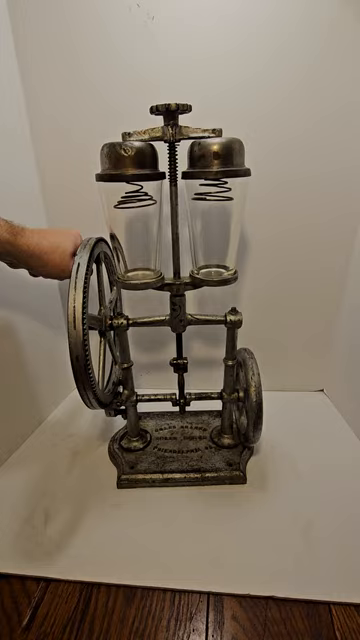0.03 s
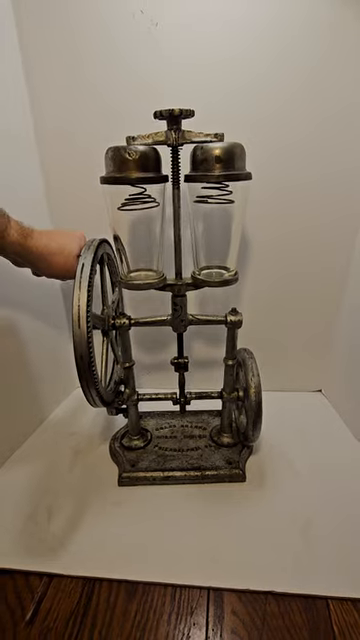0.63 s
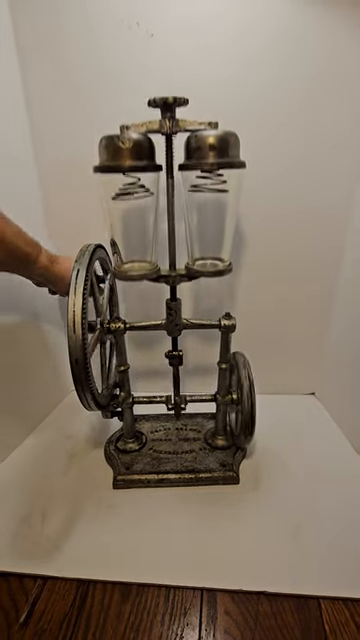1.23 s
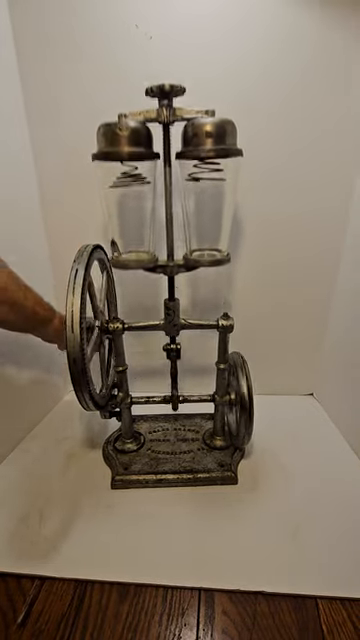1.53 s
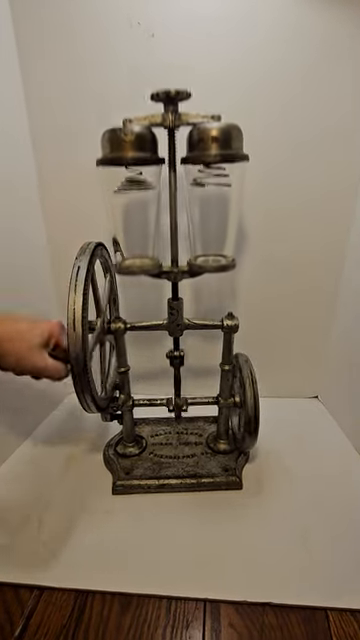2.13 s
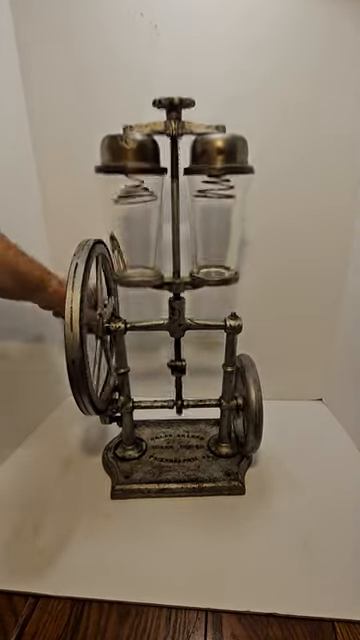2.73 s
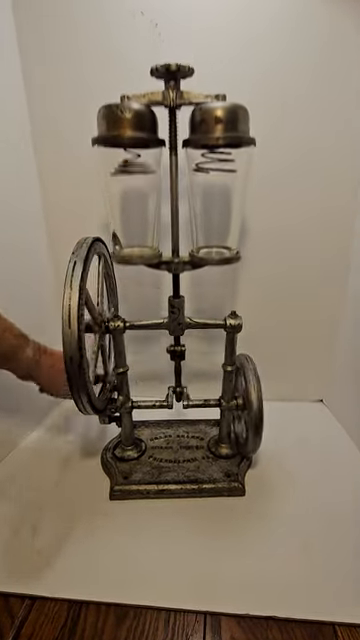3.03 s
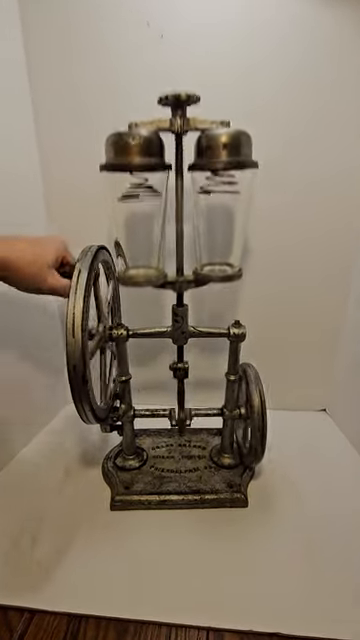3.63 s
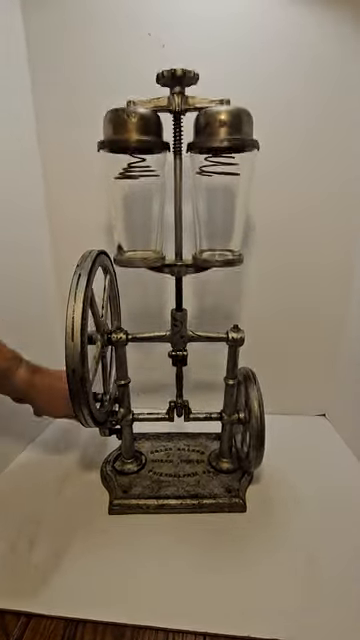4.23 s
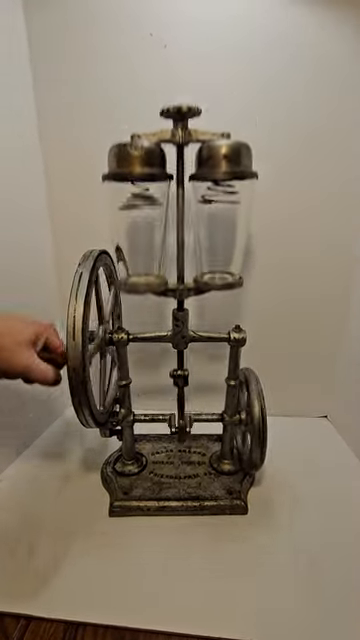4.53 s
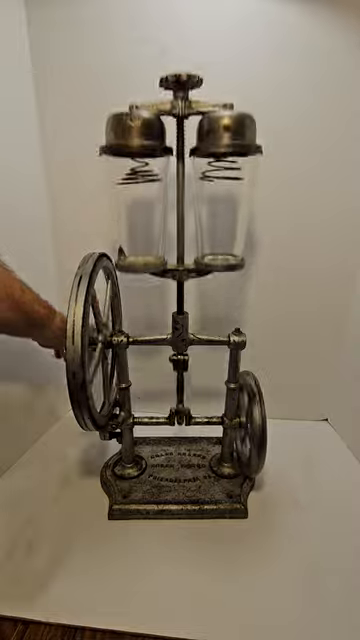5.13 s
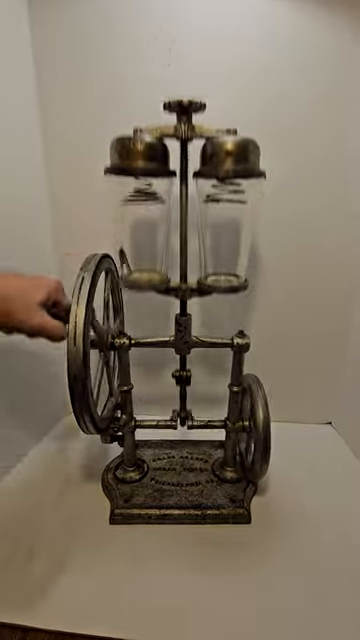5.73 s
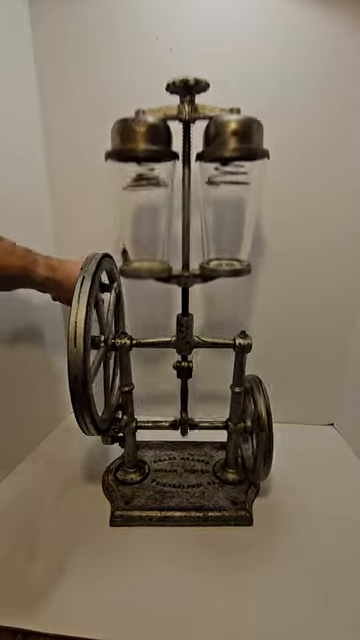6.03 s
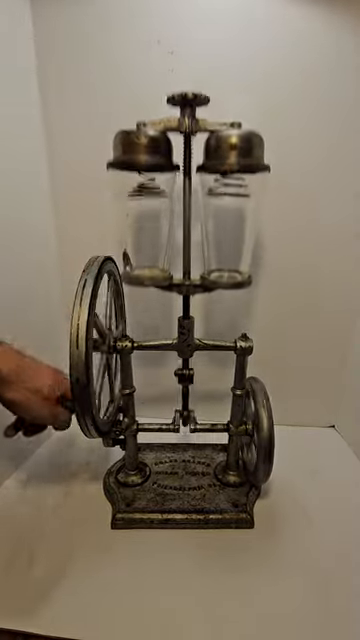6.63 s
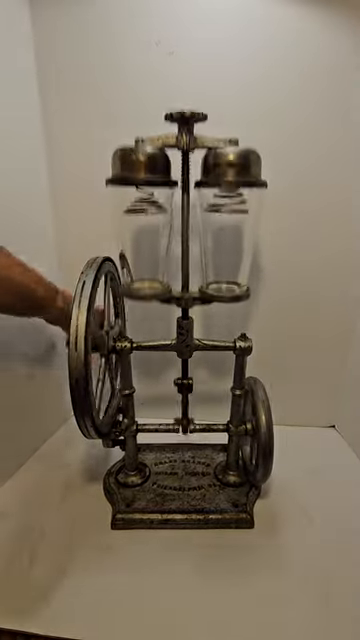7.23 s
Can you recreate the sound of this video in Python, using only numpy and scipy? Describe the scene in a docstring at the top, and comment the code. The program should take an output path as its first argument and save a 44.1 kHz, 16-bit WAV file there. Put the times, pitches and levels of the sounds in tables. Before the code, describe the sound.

An old iron shaking machine is cranked faster and faster, grinding, thudding and clattering rhythmically in a small, quiet room.

```python
"""First comes a soft bump in a small, quiet room; then a hand-cranked, cast-iron milkshake shaker
growls up to speed on a board. Its gear teeth drum the base, grind in the frame and rattle the joints.
The carriage (the part that carries two empty glasses up and down) knocks at the ends of its strokes.
Loose joints clack, the frame clanks and the base thuds. On top of that, metal caps ring,
wire coils jingle and the glasses tick in their holders."""
import sys
import numpy as np
from scipy import signal
from scipy.fft import rfft, irfft
from scipy.io import wavfile
from scipy.ndimage import uniform_filter1d

SR = 44100
rng = np.random.default_rng(int(sys.argv[2]) if len(sys.argv) > 2 else 0)


def digitize_waveform(pressure):
    """Quantize a signal to 16-bit integers and store it at the path in sys.argv[1].

    Rows of a 2-D input are taken as channels; values are limited to [-1, 1].
    """
    field = np.atleast_2d(pressure).T
    bounded = np.clip(field, -1, 1)
    quanta = np.round(bounded * 32767).astype(np.int16)
    wavfile.write(sys.argv[1], SR, quanta)


N = 329427
T = np.arange(N) / SR

# how fast the crank turns the wheel: (time [s], speed [turns/s])
CRANK_SPEED = [(.55, 0), (.58, .13), (.7, .11), (.76, .06), (.84, .16), (1, .24), (1.14, .26), (1.3, .626),
               (2.2, .786), (3.4, .796), (4.4, .912), (5.2, .846), (6, .93), (7.46, .945)]
# the uneven load in every turn: (position [turns], boost on base [dB], boost on frame and joints [dB])
WHEEL_LOAD = [(0, 4, 1.5), (0.103, 2, 0.5), (0.2, 2.3, 1), (0.298, -0.5, 1), (0.398, 2.6, 0),
              (.5, -2, -0.5), (.6, 1.5, 1.5), (.7, 0.3, 2.5), (.8, 5, 3.5), (.9, -0.5, -1)]
# the shaft judders as it speeds up: (time [s], rate [judders/s], level [dB])
JUDDERS = [(1.15, 163, -62), (1.2, 164, -45), (1.3, 139, -34), (1.43, 138, -36.5), (1.53, 107, -50)]

# Event levels are relative: each source adds its own gain and tone. # the base bumps on the board; the faint
# first bump, at 0.39 s, comes as a hand takes hold of the crank: (time [s], level [dB])
THUDS = [(0.39, -55.5), (0.589, -45), (0.956, -46), (1.011, -43.5), (1.215, -37), (1.293, -35),
         (1.57, -31.5), (1.916, -34), (2.206, -25), (2.439, -27.5), (2.678, -26.5), (2.966, -23),
         (3.154, -24), (3.207, -27.5), (3.391, -30), (3.542, -27), (4.168, -23.5), (4.384, -27),
         (4.585, -25.5), (4.668, -27.5), (4.846, -23), (5.224, -23.5), (5.672, -25.5), (6.105, -29),
         (6.387, -26), (6.99, -25), (7.081, -24.5), (7.184, -26), (7.446, -22)]
# the driving rod takes up its slack: (time [s], level [dB])
CLANKS = [(1.294, -42.5), (1.584, -37.5), (1.601, -37), (1.917, -39.5), (2.076, -43.5), (2.181, -42),
          (2.322, -44), (2.439, -39), (2.903, -40.5), (3.426, -37.5), (3.485, -43), (3.642, -37),
          (3.73, -49), (3.798, -40.5), (4.099, -34), (4.119, -41), (4.164, -47), (4.583, -47), (4.824, -38),
          (5.039, -37), (5.223, -39), (5.276, -48), (5.479, -40.5), (5.922, -35), (6.323, -41),
          (6.385, -44), (6.582, -46), (6.835, -43), (7.009, -38), (7.404, -37.5), (7.449, -34)]
# the heavy wheel drops over in its bearing: (time [s], level [dB])
CLUNKS = [(2.393, -34.5), (2.785, -43), (3.873, -36.5), (4.783, -35), (5.667, -36), (5.884, -36),
          (6.324, -33.5), (6.769, -31)]
# the carriage lands: (time [s], level [dB])
KNOCKS = [(.586, -55.5), (1.216, -40.5), (1.656, -36), (2.038, -39), (2.257, -32), (2.459, -31.5),
          (2.774, -34), (2.965, -30.5), (3.149, -37), (3.492, -30.5), (3.706, -31.5), (3.749, -35),
          (3.88, -33), (3.932, -35), (4.167, -30.5), (4.665, -34), (4.78, -35), (4.845, -28),
          (5.279, -31.5), (5.665, -34), (5.776, -41), (5.95, -28.5), (6.388, -29.5), (6.84, -33.5),
          (6.862, -36), (7.035, -30.5), (7.451, -34)]
# the hardest clacks of the joints: (time [s], level [dB])
CLACKS = [(0.802, -39.5), (1.262, -35.5), (1.2914, -27.5), (1.5837, -29), (1.613, -21.5), (1.6547, -19),
          (1.741, -28.5), (1.9154, -20), (1.958, -31), (1.992, -27), (2.035, -28.5), (2.144, -29),
          (2.263, -27), (2.322, -25.5), (2.4931, -25), (2.5172, -25), (2.7971, -27.5), (2.9036, -28),
          (2.9627, -20.5), (3.1459, -27), (3.262, -24.5), (3.4171, -21), (3.466, -27), (3.732, -24.5),
          (3.908, -28.5), (4.162, -20), (4.234, -25.5), (4.265, -33), (4.3707, -21), (4.433, -28.5),
          (4.634, -29.5), (4.5853, -29.5), (4.783, -29.5), (4.821, -21.5), (4.868, -23), (4.891, -18.5),
          (4.9794, -22.5), (5.146, -25), (5.2, -24), (5.226, -28), (5.2773, -18.5), (5.48, -25.5),
          (5.596, -35), (5.781, -22), (5.8823, -32), (5.923, -22), (5.968, -21), (6.237, -26),
          (6.3226, -27), (6.348, -21.5), (6.39, -21.5), (6.452, -28.5), (6.4832, -26.5), (6.5821, -18),
          (6.6415, -24), (6.679, -25), (6.866, -29), (7.0116, -19), (7.0538, -21.5), (7.092, -29),
          (7.311, -26.5), (7.347, -26.5), (7.374, -31), (7.3987, -19)]
# the first cap hits its glass: (time [s], level [dB])
CAP_A_HITS = [(1.5838, -33.5), (1.9155, -39), (2.144, -43), (2.665, -42.5), (2.9053, -39), (3.1467, -35),
              (3.4271, -38.5), (3.652, -45.5), (3.7334, -40.5), (3.892, -43), (4.0841, -41),
              (4.1091, -31.5), (4.1244, -30.5), (4.312, -44.5), (4.5835, -40.5), (4.82, -43), (4.9816, -38),
              (5.0225, -41), (5.2001, -35), (5.2265, -32.5), (5.482, -45), (5.64, -42), (6.0965, -38.5),
              (6.3061, -42), (6.328, -33.5), (6.3444, -32), (6.5819, -40.5), (6.695, -51), (6.82, -42),
              (7.056, -43.5), (7.15, -46), (7.3756, -36), (7.3994, -34), (7.4505, -34)]
# the second cap hits its glass: (time [s], level [dB])
CAP_B_HITS = [(2.4947, -50), (3.7324, -47.5), (4.1594, -48), (4.8953, -38.5), (5.782, -46), (5.9688, -35.5),
              (7.0559, -36.5)]
# a glass ticks in its holder: (time [s], level [dB], sizzle level [dB])
TICKS = [(2.225, -39.5, -65), (2.322, -41.5, -49), (2.967, -41, -48), (3.415, -41, -64),
         (4.171, -32.5, -34), (4.78, -36.5, -41), (5.072, -36, -58), (5.213, -40, -60),
         (5.282, -33.5, -37.5), (5.5157, -41, -52), (5.88, -36.5, -50), (5.944, -25, -43),
         (6.323, -37.5, -48), (6.384, -32, -55), (6.559, -34.5, -49), (6.8344, -31, -41)]
# dry metal slides with a faint hiss: (start [s], end [s], level [dB])
SCRAPES = [(2.525, 2.98, -59), (4.738, 5.267, -54.5)]
# a wire coil brushes its glass: (time [s], level [dB])
BRUSHES = [(2.875, -55), (4.555, -52), (4.92, -46), (5.228, -52), (5.665, -55), (6.048, -57), (6.762, -64),
           (7.02, -54), (7.09, -65)]

# A mode is a note that a struck part rings at; t60 is the time it takes to fade by 60 dB.
# modes of the base, frame, wheel, coils and caps: (pitch [Hz], level [dB], t60 [s])
BASE_MODES = [(227.5, 2.5, 0.044), (266, -5.5, 0.17), (392, -19.5, 0.19)]
FRAME_MODES = [(895, -5, .08), (1120, -4, .06), (1211, 0, .11), (1305, -2, .07)]
WHEEL_MODES = [(776, -5.5, .07), (861, 2, 0.06), (901, 4.5, 0.072)]
COIL_MODES = [(5900, -14, .05), (6460, 5.5, 0.14), (7400, -4.5, 0.12), (8470, -6, 0.042), (11500, -9, .03),
              (14600, -12, .02)]
CAP_A_MODES = [(4380, -13, .05), (4535, -9, .09), (4740, -7, .04), (4815, -4, .07), (4829, -5, .17),
               (5173, -18, .4), (6638, -21, .12)]
CAP_B_MODES = [(5176, -11, .3), (6640, -8, .09), (7203, -2, .14), (7450, -9, .09), (8226, -11, .12)]
# pitches that the base and frame strengthen: (centre [Hz], width [Hz], boost [dB])
BODY_PEAKS = [(54, 10, 6.5), (93.4, 15.3, 6.5), (158.3, 11, 6), (225.7, 25, 6.5), (270.6, 40, 9),
              (384, 58, 6), (447, 84, 8.5), (515.4, 60, 9), (632, 45, 9), (732, 80, 11.5), (1204, 72, 4),
              (1347, 165, 7), (1625, 19, 7), (2194, 77, 10.5), (2547, 130, 5), (2654, 58, 3),
              (3220, 334, 7), (4380, 200, 3.5)]

# the tone of each sound, from bass to treble: (frequency [Hz], level [dB])
AIR_TONE = [(15, -70), (25, 13), (108, -1.5), (185, 2.5), (1480, -14.5), (3430, -9.5), (3920, -5),
            (7000, -24.5), (8830, -41), (12000, -27.5)]
BASE_TONE = [(15, -48), (28, -1), (45, -3), (62, -10), (90, -5), (125, -5), (180, -7.5), (250, -4.5),
             (340, -17), (500, -34.5), (1000, -56.5), (3000, -82.5)]
FRAME_TONE = [(100, -37.5), (340, -5.5), (480, -4.5), (850, -2.5), (1000, -3.5), (1250, -6.5), (1800, -4.5),
              (3000, -28.5), (8000, -55)]
JOINT_TONE = [(200, -8.5), (900, -8.5), (1800, -9), (2400, -7), (3400, -4.5), (4500, -2), (5500, -9.5),
              (6800, -13.5), (8300, -26), (10000, -45), (15000, -38)]
RATTLE_TONE = [(200, -7), (700, -6), (1800, -4), (2500, -7), (3400, -6.5), (4500, 5.5), (5500, -2.5),
               (6800, -23.5), (8300, -15), (10000, -39.5)]
KNOCK_TONE = [(100, -38), (250, -22), (340, -6), (650, -5.5), (850, -6), (1100, -5.5), (1800, -18),
              (3000, -16), (8000, -39.5)]
CRACK_TONE = [(300, -11), (850, -13.5), (1350, -3), (1700, -10.5), (2200, -7), (3000, -11.5), (8000, -37)]
GLASS_TONE = [(500, 3), (2500, -7.5), (4500, 9), (6500, -3.5), (8500, -5.5), (10200, -15), (11600, -13),
              (13000, -29), (16000, -27)]
SIZZLE_TONE = [(6000, -1), (10500, -18.5), (11600, 2), (12700, -8), (14700, 0.5), (16000, -10)]
# how wide the sound spreads: (frequency [Hz], gain on the left-right difference [dB])
STEREO_WIDTH = [(60, -11.5), (140, -17.5), (260, -11), (500, -3.5), (1000, -4), (2000, 0.5)]
# which side the sound leans to: (frequency [Hz], left minus right [dB])
STEREO_TILT = [(300, 0), (480, 4), (700, -0.5), (2300, -0.5), (4200, -7.5), (4800, -8), (5300, 0.5),
               (7000, 12), (9600, 12.5), (11500, 0), (13000, 2), (14500, -8.5)]

TEETH_PER_TURN, STROKES_PER_TURN = 110, 5
WORKING_SPEED = .85  # turns per second
# how each sound follows the crank:
# (level at working speed [dB], rise per doubling of speed [dB], swell [dB], peak of swell [strokes])
ROCKING = (-32.5, 6.5, 2, 3)
DRUMMING = (-30.5, 8, 3, 3)
GRINDING = (-41, 8.5, 3.5, 1.5)
RATTLING = (-42.5, 12, .5, 2)
ON_BASE, ON_JOINTS = 1, 2  # columns of WHEEL_LOAD
ROOM_T60_S, TOP_HZ = .25, 15750


def undb(db):
    """Turn decibels into a gain."""
    return 10 ** (np.asarray(db) / 20)


def unit(x):
    """Scale a sound to an average power of 1."""
    return x / np.sqrt(np.mean(x ** 2))


def even(x, span_s):
    """Hold the slow level at 1 but keep the quick flicker."""
    power = uniform_filter1d(np.mean(x ** 2, axis=0), int(span_s * SR) + 1)
    return x / np.sqrt(power.clip(0) + 1e-6)


def curve(table, column):
    """Join the points of a time table, giving a value for every sample."""
    rows = np.array(table)
    return np.interp(T, rows[:, 0], rows[:, column])


def shape_db(points, hz):
    """Read a tone table at any frequency, on a scale of octaves."""
    rows = np.array(points)
    return np.interp(np.log(hz + 1), np.log(rows[:, 0]), rows[:, 1])


def add(out, s, sound):
    """Mix a sound in, starting at s seconds."""
    start = max(int(s * SR), 0)
    part = out[..., start:start + sound.shape[-1]]
    part += sound[..., :part.shape[-1]]


def convolve(x, response):
    """Filter a sound: every sample sets off a copy of the response."""
    return signal.oaconvolve(np.atleast_2d(x), np.atleast_2d(response), axes=1)[:, :N]


def tight_filter(gain):
    """The quickest filter response with this tone (minimum phase); energy 1."""
    cepstrum = irfft(np.log(gain))
    half = len(cepstrum) // 2
    cepstrum[1:half] *= 2
    cepstrum[half + 1:] = 0
    response = irfft(np.exp(rfft(cepstrum)))
    return response / np.linalg.norm(response)


def colour(x, tone, peaks=(), size=16384):
    """Give a sound a broad tone, plus any narrow peaks."""
    hz = np.arange(size // 2 + 1) * SR / size
    gain = undb(shape_db(tone, hz))
    for centre, width, db in peaks:
        gain *= np.sqrt(1 + (undb(db) ** 2 - 1) / (1 + (2 * (hz - centre) / width) ** 2))
    return convolve(x, tight_filter(gain))


def below(x, edge_hz):
    """Keep the part of a sound below a frequency."""
    return signal.sosfiltfilt(signal.butter(2, edge_hz, fs=SR, output="sos"), x)


def fade(t60, size=22050):
    """A level that falls by 60 dB every t60 seconds."""
    return np.exp(-np.log(1000) * np.arange(size) / SR / t60)


def burst(t60, size=22050):
    """A puff of fading noise; energy 1."""
    noise = fade(t60, size) * rng.standard_normal(size)
    return noise / np.linalg.norm(noise)


def radiate(x, ring_t60, room_db):
    """Add a part's short ring and the room's echo, by a separate path to each ear."""
    paths = []
    for _ in range(2):
        path = burst(ring_t60) + undb(room_db) * burst(ROOM_T60_S)
        power = uniform_filter1d(np.abs(rfft(path)) ** 2, size=25)
        path = convolve(path, tight_filter(1 / np.sqrt(power)))[0]  # flatten its tone
        paths.append(path / np.linalg.norm(path))
    return convolve(x, np.array(paths))


def contact(grit_t60, ring_share, band_hz=(1100, 4100), count=4, size=4096):
    """Iron touches iron: grit plus a few short notes that depend on the spot hit; energy 1."""
    envelope = fade(.02, size) * (1 - fade(.0005, size))
    hz = rng.uniform(*band_hz, (count, 1))
    ring = envelope * np.sin(2 * np.pi * (hz * T[:size] + rng.random((count, 1)))).sum(axis=0)
    touch = burst(grit_t60, size) + ring_share * ring / np.linalg.norm(ring)
    return touch / np.linalg.norm(touch)


def bounces(gap_s, loss_db, count=5):
    """A springy part hits, then bounces at uneven gaps, ever more weakly."""
    train = np.zeros(4096)
    times = np.cumsum(gap_s * rng.uniform(.66, 1.5, count))
    at = ((times - times[0]) * SR).astype(int).clip(0, 4095)
    train[at] = undb(-loss_db * np.arange(count))
    return train


def strike(modes, detune, scatter_db, size=8192):
    """One blow rings a set of modes, whose pitch and balance vary with the spot hit; energy 1."""
    hz, db, t60 = np.array(modes).T[:, :, None]
    pitch_luck, sign_luck, level_luck = rng.standard_normal((3, len(modes), 1))
    waves = np.sin(2 * np.pi * hz * (1 + detune * pitch_luck) * T[:size]) * np.sign(sign_luck)
    ring = (undb(db + scatter_db * level_luck) * fade(t60, size) * waves).sum(axis=0)
    return ring / np.linalg.norm(ring)


def bouncing_strike(modes, gap_s, loss_db, detune, scatter_db):
    """Four ever weaker blows on the same modes; energy 1."""
    out, train = np.zeros(12288), bounces(gap_s, loss_db, count=4)
    for at in np.flatnonzero(train):
        add(out, T[at], train[at] * strike(modes, detune, scatter_db))
    return out / np.linalg.norm(out)


def turns():
    """How many turns the wheel has made so far."""
    return np.cumsum(curve(CRANK_SPEED, 1)) / SR


def load_db(part, column):
    """A part gets louder with speed, swells once a stroke and follows the wheel's uneven load."""
    working_db, per_doubling_db, swell_db, peak = part
    wheel, turn = np.array(WHEEL_LOAD), turns()
    doublings = np.log2(curve(CRANK_SPEED, 1) / WORKING_SPEED + 1e-4)
    swell = np.cos(2 * np.pi * (turn * STROKES_PER_TURN - peak))
    uneven_db = np.interp(turn, wheel[:, 0], wheel[:, column], period=1)
    return working_db + per_doubling_db * doublings + swell_db * swell + uneven_db


def each_stroke(count, first, scatter):
    """Sample positions, count per stroke, each a bit early or late; first and scatter are in strokes."""
    stroke = turns() * STROKES_PER_TURN
    due = np.arange(first, stroke[-1], 1 / count)
    return np.searchsorted(stroke, due + scatter * rng.standard_normal(len(due))).clip(0, N - 1)


def jolts(blows, gain_db, decay_s):
    """How hard the loose parts shake as each blow dies away."""
    out, tail = np.zeros(N), np.exp(-T[:16384] / decay_s)
    for s, db in blows:
        add(out, s, undb(db + gain_db) * tail)
    return out


def room_air():
    """The faint, steady hush of the room."""
    return undb(-64.5) * colour(rng.standard_normal((2, N)), AIR_TONE)


def coil_brushes(under_rattle_db=25.5, brush_s=.043):
    """The wire coils slide on the glass: a fine hiss once a stroke, and short bright splashes."""
    sliding = np.cos(np.pi * (turns() * STROKES_PER_TURN - RATTLING[-1])) ** 2
    level = sliding * undb(load_db(RATTLING, ON_JOINTS) - under_rattle_db)
    swell = np.hanning(int(brush_s * SR))
    for s, db in BRUSHES:
        add(level, s, undb(db) * swell)
    return colour(level * rng.standard_normal((2, N)), SIZZLE_TONE)


def coil_jingles(level_db=-30, spread_db=5.5):
    """The wire coils under the caps jingle three times a stroke, louder at speed."""
    out, speed = np.zeros(N), curve(CRANK_SPEED, 1) / WORKING_SPEED
    for at in each_stroke(count=3, first=.7, scatter=.1):
        gain = speed[at] ** 2 * undb(level_db + spread_db * np.tanh(rng.standard_normal()))
        jingle = bouncing_strike(COIL_MODES, gap_s=.012, loss_db=.5, detune=.0248, scatter_db=7)
        add(out, T[at], gain * jingle)
    return radiate(out, ring_t60=.02, room_db=-14)


def glass_ticks():
    """Glass hits its metal holder with a hard, sizzling tick; dry sliding adds a hiss."""
    blows, grit = np.zeros((2, N))
    for s, db, sizzle_db in TICKS:
        train = bounces(gap_s=.004, loss_db=4.5, count=4)
        add(blows, s, undb(db + 26.5) * convolve(burst(.011), train)[0])
        add(grit, s, undb(sizzle_db + 25) * convolve(burst(.01), train)[0])
    for start, end, db in SCRAPES:
        swell = np.hanning(int((end - start) * SR))
        add(grit, start, undb(db) * swell * rng.standard_normal(len(swell)))
    return (colour(radiate(blows, ring_t60=.078, room_db=-16.5), GLASS_TONE)
            + colour(radiate(grit, ring_t60=.033, room_db=-49), SIZZLE_TONE))


def cap_chatter(hits, modes, ring_db, buzz_db, gap_s, detune):
    """A domed cap bounces on its glass; each bounce clicks and rings it like a small bell."""
    rings, clicks = np.zeros((2, N)), np.zeros(N)
    longest = max(t60 for *_, t60 in modes)
    for s, db in hits:
        train = bounces(gap_s, loss_db=1.7, count=6) * undb(2.5 * rng.standard_normal(4096))
        for hz, mode_db, t60 in modes:
            envelope = fade(t60) * (1 - fade(.0025))
            # the notes that the glass muffles most also shift most from hit to hit
            pitch = hz * (1 + detune * longest / t60 * rng.standard_normal())
            phase = 2 * np.pi * (pitch * T[:len(envelope)] + rng.random((2, 1)))
            ring = convolve(envelope * np.sin(phase), train)
            gain = undb(db + mode_db + rng.uniform(-1.34, 2))
            add(rings, s, gain * ring * np.linalg.norm(envelope) / np.linalg.norm(ring))
        add(clicks, s, undb(db) * convolve(contact(.016, .5), train / np.linalg.norm(train))[0])
    buzz = colour(radiate(clicks, ring_t60=.052, room_db=-18.5), JOINT_TONE, BODY_PEAKS)
    return undb(ring_db) * rings + undb(buzz_db) * buzz


def shaft_growl():
    """The shaft sticks and slips in its bearing, sending a rough, falling note through the base."""
    cycle = np.floor(np.cumsum(curve(JUDDERS, 1)) / SR)
    slips = np.diff(cycle, prepend=0) * undb(2 * rng.standard_normal(N))
    running = (T > JUDDERS[0][0]) & (T < JUDDERS[-1][0])
    level = running * undb(curve(JUDDERS, 2))
    return colour(unit(slips - slips.mean()) * level, BASE_TONE, BODY_PEAKS)[0]


def base_thuds():
    """The base bumps on its board: a few low notes over a dull thump."""
    rings, thumps = np.zeros((2, N))
    for s, db in THUDS:
        add(rings, s, undb(db) * strike(BASE_MODES, detune=.087, scatter_db=6))
        add(thumps, s, undb(db) * burst(.082))
    return undb(26) * rings + undb(24.5) * colour(thumps, BASE_TONE, BODY_PEAKS)


def clanks_and_clunks():
    """The driving rod clanks the frame and the wheel drops with a clunk; both start with a crack."""
    rings, cracks = np.zeros((2, N))
    for s, db in CLANKS:
        clank = bouncing_strike(FRAME_MODES, gap_s=.012, loss_db=4, detune=.012, scatter_db=3)
        add(rings, s, undb(db + 32) * clank)
    for s, db in CLUNKS:
        add(rings, s, undb(db + 31) * strike(WHEEL_MODES, detune=.012, scatter_db=2))
    for s, db in CLANKS + CLUNKS:
        add(cracks, s, undb(db) * burst(.032))
    return radiate(rings + undb(26) * colour(cracks, CRACK_TONE), ring_t60=.018, room_db=-10)


def carriage_knocks():
    """The heavy carriage lands and bounces: a hollow knock that rings on in the base and frame."""
    blows = np.zeros(N)
    for s, db in KNOCKS:
        train = bounces(gap_s=.011, loss_db=5)
        add(blows, s, undb(db) * convolve(contact(.04, .15, band_hz=(400, 900)), train)[0])
    return undb(30) * colour(radiate(blows, ring_t60=.045, room_db=-6.5), KNOCK_TONE, BODY_PEAKS)


def joint_clacks(spread_db=6.5):
    """Iron hits iron in the loose joints: hard blows that bounce twice, with softer scuffs between."""
    blows, scuffs = np.zeros((2, N))
    for s, db in CLACKS:
        train = bounces(gap_s=.0078, loss_db=11, count=3)
        add(blows, s, undb(db - 1.5) * convolve(contact(.012, .56), train)[0])
    scuff_db = load_db(RATTLING, ON_JOINTS) + 3.5
    for at in each_stroke(count=1.8, first=.8, scatter=.15):
        scuff = convolve(contact(.035, .65), bounces(gap_s=.005, loss_db=5, count=3))[0]
        add(scuffs, T[at], undb(scuff_db[at] + spread_db * np.tanh(rng.standard_normal())) * scuff)
    blows += below(scuffs, edge_hz=5000)
    return undb(21) * colour(radiate(blows, ring_t60=.048, room_db=-10), JOINT_TONE, BODY_PEAKS)


def joint_rattle(jump_chance=.75, rasp_s=.8, rasp_decay_s=.096):
    """Most gear teeth make a loose joint jump; at low speed the joints mostly scrape."""
    speed, tooth = curve(CRANK_SPEED, 1), turns() * TEETH_PER_TURN
    chatter = np.zeros(N)
    jumps = np.flatnonzero(rng.random(int(tooth[-1])) < jump_chance)
    for at in np.searchsorted(tooth, jumps + .45 * rng.standard_normal(len(jumps))).clip(0, N - 1):
        gain = undb(6 * speed[at] * np.tanh(rng.standard_normal()))
        add(chatter, T[at], gain * contact(.013, 1.1, band_hz=(2350, 3000), count=2, size=2048))
    scrape = undb(-22) / (speed ** 2 + .08) * rng.standard_normal(N)
    ringing = radiate(unit(chatter) + scrape, ring_t60=.04, room_db=-6)
    rattle = even(colour(ringing, RATTLE_TONE, BODY_PEAKS), span_s=.11)
    # the dry shaft rasps as it breaks free
    rasp = undb(-51) * (T > rasp_s) * np.exp(-np.abs(T - rasp_s) / rasp_decay_s)
    shaking = jolts(CLACKS, gain_db=-16.5, decay_s=.029)
    return rattle * np.hypot(undb(load_db(RATTLING, ON_JOINTS)) + rasp, shaking)


def tooth_blows(scatter_db, jitter_teeth, rub_db):
    """Each tooth of the wheel hits the small gear a bit unevenly, over the rub of sliding iron."""
    tooth = turns() * TEETH_PER_TURN
    count = int(tooth[-1])
    time_luck, level_luck = rng.standard_normal((count, 2)).T
    at = np.searchsorted(tooth, np.arange(count) + jitter_teeth * time_luck).clip(0, N - 1)
    blows = np.bincount(at, undb(scatter_db * np.tanh(level_luck)), N)
    return unit(blows) + undb(rub_db) * rng.standard_normal(N)


def gears(rocks_from_s=1.55, still_board_db=-11):
    """The gear teeth drum the base, rock the board and grind in the frame."""
    teeth = tooth_blows(scatter_db=2, jitter_teeth=.2483, rub_db=-4.5)
    rough_teeth = teeth + undb(1.5) * rng.standard_normal((2, N))
    drum = even(colour(rough_teeth, BASE_TONE, BODY_PEAKS), span_s=.076)
    rock = below(drum, edge_hz=130)
    # the board lies nearly still until the first full stroke shakes it
    rock_db = load_db(ROCKING, ON_BASE) + still_board_db * (T < rocks_from_s)
    ringing = radiate(teeth, ring_t60=.043, room_db=-3.5)
    grind = even(colour(ringing, FRAME_TONE, BODY_PEAKS), span_s=.11)
    shaking = jolts(KNOCKS, gain_db=-10.5, decay_s=.05)
    return (rock * undb(rock_db) + (drum - rock) * undb(load_db(DRUMMING, ON_BASE))
            + grind * np.hypot(undb(load_db(GRINDING, ON_JOINTS)), shaking))


def scene():
    """Mix the room and the machine; the bass sits near the middle and the treble leans left or right."""
    mix = room_air() + gears() + joint_rattle() + joint_clacks() + carriage_knocks()
    mix += clanks_and_clunks() + base_thuds() + shaft_growl()
    mix += cap_chatter(CAP_A_HITS, CAP_A_MODES, ring_db=14.5, buzz_db=29.5, gap_s=.005, detune=.00091)
    mix += cap_chatter(CAP_B_HITS, CAP_B_MODES, ring_db=4.5, buzz_db=25, gap_s=.0057, detune=.00023)
    mix += glass_ticks() + coil_jingles() + coil_brushes()
    left, right = rfft(mix)
    hz = np.arange(len(left)) * SR / N
    mid = (left + right) / 2
    side = (left - right) / 2 * undb(shape_db(STEREO_WIDTH, hz))
    tilt = undb(shape_db(STEREO_TILT, hz) / 2)
    return irfft(np.array([(mid + side) * tilt, (mid - side) / tilt]), N)


def record(dry):
    """Fade in quickly after a moment of near silence, and cut the highest treble."""
    fade_in = np.interp(T, [.07, .078], [.03, 1])
    return signal.sosfilt(signal.ellip(10, .2, 80, TOP_HZ, fs=SR, output="sos"), dry * fade_in)


dry = scene()
out = record(dry)
digitize_waveform(out)
```